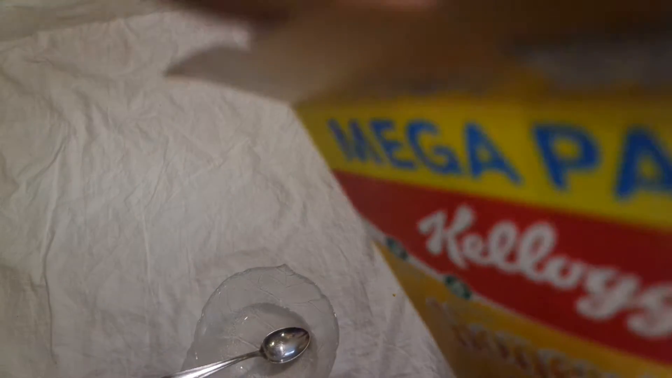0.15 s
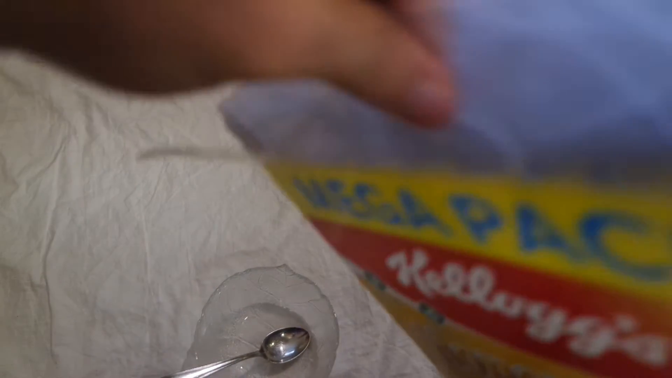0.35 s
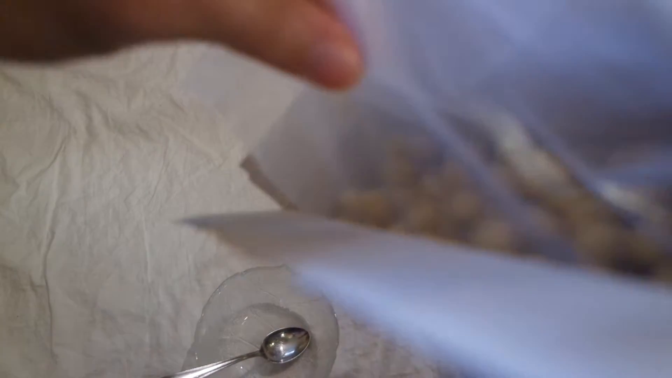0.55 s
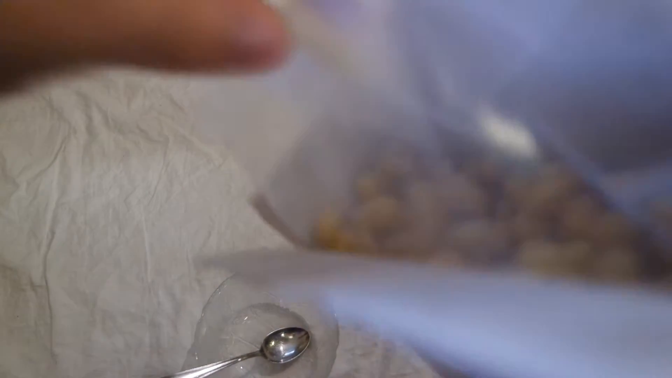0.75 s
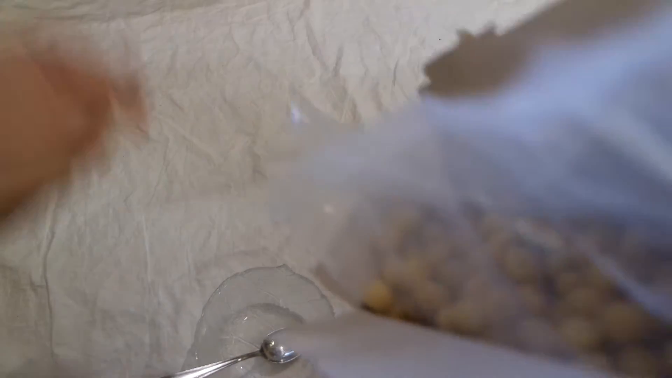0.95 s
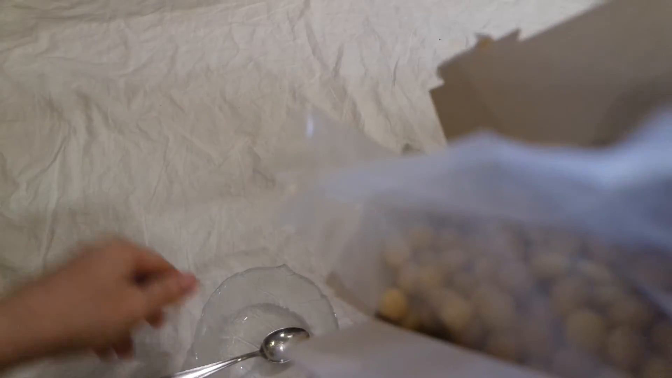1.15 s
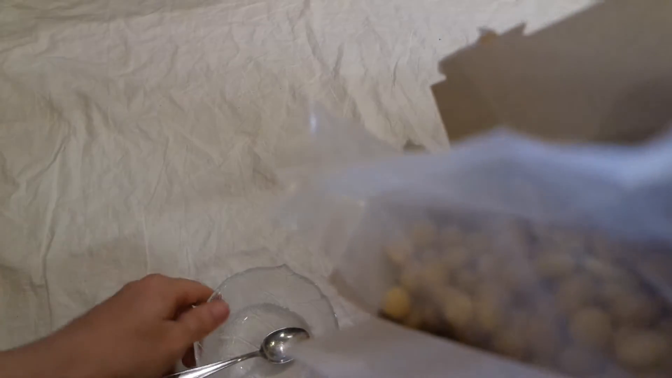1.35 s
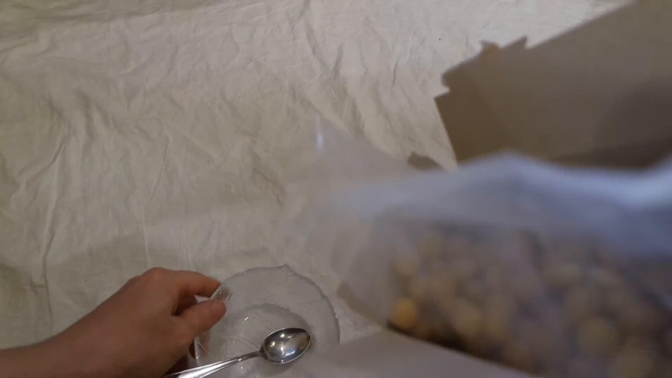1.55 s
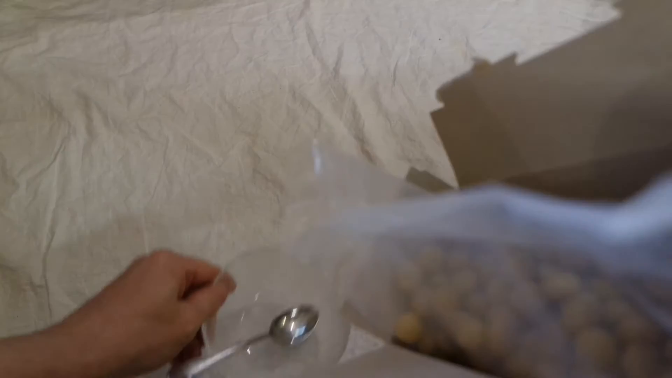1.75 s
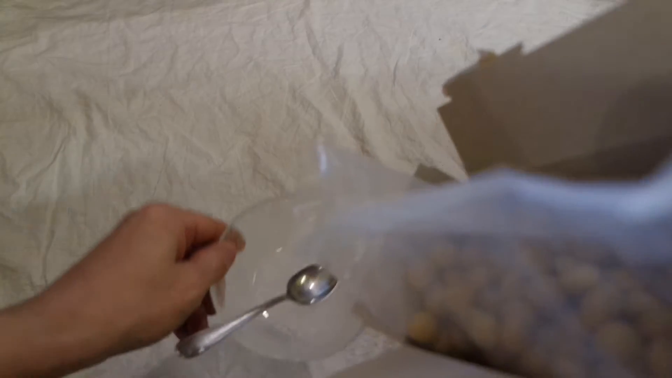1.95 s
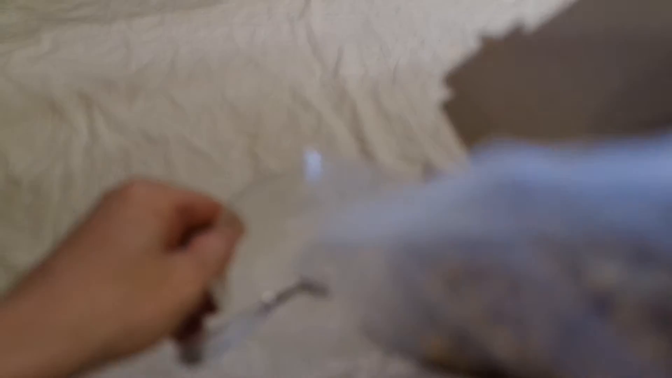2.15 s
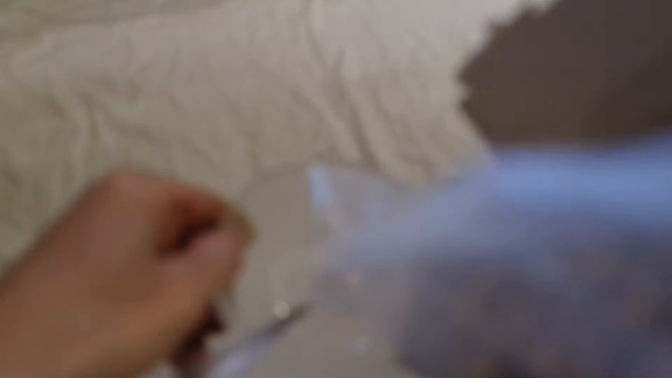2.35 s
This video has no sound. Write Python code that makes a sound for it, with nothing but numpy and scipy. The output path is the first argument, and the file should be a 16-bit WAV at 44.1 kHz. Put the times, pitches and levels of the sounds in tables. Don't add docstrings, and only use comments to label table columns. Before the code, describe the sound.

Close to the microphone indoors, plastic film snaps and rustles hard, followed by cereal rattling and dull cardboard knocks; after about a second only faint ticks, soft room hush and a small final rustle remain.

```python
import sys
import numpy as np
from scipy import signal
from scipy.fft import rfft, irfft
from scipy.io import wavfile
from scipy.ndimage import uniform_filter1d

SR = 44100
rng = np.random.default_rng(int(sys.argv[2]) if len(sys.argv) > 2 else 0)


def inscribe(sig):
    pcm = np.round(np.clip(np.atleast_2d(sig).T, -1, 1) * 32767)
    wavfile.write(sys.argv[1], SR, pcm.astype(np.int16))


def linear_from_db(decibels):
    return 10 ** (np.asarray(decibels, float) / 20)


N = 110250

# f/Hz, density/dB
SNAP_TONE = [(290, -22.5), (900, -6.5), (3900, -1.5), (5890, -3), (9270, -4.5), (10800, -5.5), (13200, 1.5),
             (14800, -9.5)]


def evened(x):
    return x / np.sqrt(np.mean(x ** 2) + 1e-20)


def read(points, hz):
    f, value = np.transpose(points)
    return np.interp(np.log(hz + 1), np.log(f + 1), value)


def add(mix, s, sound):
    part = mix[round(s * SR):][:len(sound)]
    part += sound[:len(part)]


def colour(x, points):
    hz = np.fft.rfftfreq(4096, 1 / SR)
    cepstrum = irfft(np.log(linear_from_db(np.maximum(read(points, hz), -90))))
    cepstrum = np.concatenate([cepstrum[:1], 2 * cepstrum[1:2048], np.zeros(2048)])
    response = irfft(np.exp(rfft(cepstrum)))[:2048]
    return signal.oaconvolve(x, response)[:len(x)]


def resonate(x, hz, width):
    r = np.exp(-np.pi * width / SR)
    return 2 * signal.lfilter([1 - r], [1, -r * np.exp(2j * np.pi * hz / SR)], x).real


def grains(rate, spread_db, low_hz, high_hz, cycles, count):
    sizes = linear_from_db(spread_db * np.minimum(rng.exponential(1, N), 4.5))
    clicks = sizes * (rng.random(N) < rate / SR)
    kind, out = rng.integers(0, count, N), np.zeros(N)
    for k, hz in enumerate(np.geomspace(low_hz, high_hz, count)):
        ringing = resonate(clicks * (kind == k), hz, hz / cycles)
        out += np.sqrt(hz) * ringing / hz * cycles
    return evened(out)


def strikes(rows, make):
    out = np.zeros((2, N))
    noise = rng.standard_normal((len(rows), 2, 6000))
    for (s, *settings), draws in zip(rows, noise):
        for port in range(2):
            add(out[port], s, make(*settings, draws[port]))
    return out


def movement(column):
    # start/s, hold/s, fade/(dB/s), liner rustle/dB, cereal shift/dB
    moves = [(-.05, 0.036, 73, -63, -69), (0.202, 0.11, 236.5, -37.5, -44), (0.352, 0.21, 150, -39, -44.5),
             (0.565, .1, 90, -39, -42), (0.687, .07, 105, -42, -55.5), (0.795, 0.15, 141, -38.5, -50.5),
             (0.84, 0.13, 101, -32.5, -38.5), (0.935, 0.13, 125, -33.5, -42.5),
             (1.063, 0.13, 128, -39.5, -46.5), (1.3, .11, 251, -63, -65.5), (1.725, 0.03, 245.5, -66, -68),
             (1.907, 0.018, 119.5, -60, -58.5), (1.98, 0.57, 100, -74, -71.5),
             (2.387, 0.037, 293.5, -65, -64.5), (2.429, 0.088, 148, -47, -47.5)]
    rise_s = 0.014
    t, power = np.arange(N) / SR, 0
    for start, hold, fade_db, *peak_db in moves:
        rise = np.clip((t - start) / rise_s, 0, 1)
        fade = fade_db * np.maximum(t - start - hold, 0)
        power = power + (rise * linear_from_db(peak_db[column] - fade)) ** 2
    return np.sqrt(power)


def pair(x, other):
    # f/Hz, left-right likeness (0 to 1)
    likeness = [(25, .3), (100, .9), (500, .97), (2000, .88), (5000, .68), (14000, .45)]
    lag_s, left_db = 2.4e-5, -2
    hz = np.fft.rfftfreq(N, 1 / SR)
    same = np.clip(read(likeness, hz), 0, 1)
    left = same * rfft(x) + np.sqrt(1 - same ** 2) * rfft(other)
    left = left * np.exp(-2j * np.pi * hz * lag_s)
    shade = linear_from_db(left_db * np.clip(hz / 4000 + 0.9, 0, 1.2))
    return np.array([irfft(left * shade, N), x])


def air():
    # f/Hz, density/dB
    hush_tone = [(12, -28.5), (20, 4.5), (198, -11.5), (455, -11), (599, -16.5), (1130, -18.5),
                 (3330, -26.5), (14800, -30.5)]
    hush_db, whine_db, whine_hz, whine_width_hz = -67.5, -89, 8050, 200
    a, b, c = rng.standard_normal((3, N))
    hush = pair(evened(colour(a, hush_tone)), evened(colour(b, hush_tone)))
    whine = evened(resonate(c, whine_hz, whine_width_hz))
    return linear_from_db(hush_db) * hush + linear_from_db(whine_db) * whine


def settling():
    return linear_from_db(-88) * grains(35, 2, 1200, 3500, 2.8, count=8)


def rustle():
    # f/Hz, density/dB
    liner_tone = [(710, -23), (1200, -10.5), (1580, -9.5), (6450, -6), (8750, -8), (13600, -2.5),
                  (14800, -7.5)]
    clump_s, clump_db = 0.003, 1.9
    span = max(round(clump_s * SR), 1)
    drift = uniform_filter1d(uniform_filter1d(rng.standard_normal(N), span), span)
    clumps = linear_from_db(clump_db * evened(drift))
    ports = []
    for _ in range(2):
        creases = clumps * grains(4000, -0.5, 760, 15000, 3.1, count=24)
        hiss = 0.15 * rng.standard_normal(N)
        ports.append(evened(colour(creases + hiss, liner_tone)))
    return movement(column=0) * np.array(ports)


def shifting():
    # f/Hz, width/Hz, level/dB
    box = [(425, 40, 1.5), (810, 38, 0), (1080, 90, -3.5), (1230, 51, -17.5), (2130, 120, -6.5)]
    # f/Hz, density/dB
    card_tone = [(18, -49), (30, -21), (110, -16), (260, -9.5), (413, -9.5), (655, -6), (800, -5),
                 (1080, -8.5), (1800, -16), (2340, -44), (3960, -120)]
    balls = grains(820, 0.5, 65, 2200, 2.3, count=16)
    sliding = evened(colour(rng.standard_normal(N), [(30, -5.5), (2500, 3), (4000, -35.5)]))
    drive = balls + 0.5 * sliding
    hollow = sum(linear_from_db(db) * resonate(drive, hz, width + 60) for hz, width, db in box)
    return movement(column=1) * evened(colour(drive + 0.11 * hollow, card_tone))


def knock(db, hz, ring_s, noise):
    t = np.arange(len(noise)) / SR
    phase = 2 * np.pi * hz * t
    modes = np.sin(phase) + 0.29 * np.sin(0.74 * phase)
    modes += 0.2 * np.sin(2 * phase) * linear_from_db(-60 * t / 0.03)
    body = modes * linear_from_db(-60 * t / max(ring_s, 0.01)) * np.minimum(t * hz / 0.47, 1)
    tick = 0.12 * resonate(noise, 2400, 1500) * linear_from_db(-60 * t / 0.015)
    return linear_from_db(db + 0.5) * (body + tick * hz / 400)


def knocks():
    # t/s, peak/dB, f/Hz, ring/s
    walls = [(0.176, -50.5, 187, 0.059), (0.424, -34, 708, 0.036), (.469, -31, 758, 0.034),
             (.525, -41, 890, 0.071), (.552, -42, 842, 0.19), (.553, -38, 425, .1), (.585, -39, 804, 0.11),
             (0.606, -31, 426, 0.075), (.648, -41, 433, 0.086), (.84, -38.5, 751, 0.044),
             (0.866, -34, 739, 0.14), (.879, -31.5, 998, 0.084), (.912, -28.5, 770, 0.037),
             (.948, -28.5, 434, 0.054), (0.996, -27, 282, 0.062), (1.05, -36, 780, 0.096),
             (1.1, -27, 413, 0.045), (1.1247, -21.5, 419, 0.024), (1.228, -37.5, 810, .03),
             (1.717, -58, 800, .04), (1.91, -49.5, 394, 0.025), (2.445, -56, 300, 0.055),
             (2.475, -39.5, 262, 0.082)]
    # t/s, peak/dB, f/Hz, ring/s
    thumps = [(0.236, -48, 97.2, 0.43), (0.28, -38, 149, 0.14), (0.412, -43.5, 112.5, 0.34),
              (.83, -42.5, 120, 0.12), (0.875, -36, 126, 0.14), (0.965, -43.5, 85, 0.11),
              (1.245, -46, 130, 0.08), (1.285, -52, 100, 0.092), (1.346, -54, 169, 0.079),
              (1.926, -47.5, 112, 0.12), (1.96, -51, 242.4, 0.088), (2.261, -59.5, 260, .08),
              (2.446, -47.5, 116, 0.14)]
    return strikes(walls + thumps, knock)


def snap(db, hz, ring_s, tilt_db, noise):
    noise = noise[:SR // 20]
    t = np.arange(len(noise)) / SR
    burst = noise * np.minimum(t / 0.0012, 1) ** 2
    crack = burst * linear_from_db(-60 * t / max(ring_s, 0.002))
    after = burst * linear_from_db(-26 - 60 * t / 0.013)
    tilt_db = np.clip(tilt_db, -8, 8)
    film = [(f, v + tilt_db * np.log2(max(f, 1500) / 5000)) for f, v in SNAP_TONE]
    patch = evened(resonate(resonate(crack, hz, 0.57 * hz), hz, 0.57 * hz))
    tone = evened(colour(crack + after, film)) + 0.62 * np.sqrt(hz / 6000) * patch
    return linear_from_db(db + 2.5) * tone / abs(tone).max()


def snaps():
    # t/s, peak/dB, f/Hz, ring/s, tilt/(dB/octave)
    creases = [(0.2089, -22.5, 1930, 0.047, 1), (0.2573, -24, 5030, 0.014, -4.5),
               (0.268, -6.5, 13500, 0.012, -2.1), (0.2768, -18.5, 5470, 0.008, 0.1),
               (0.2795, -9, 3810, 0.014, 2), (0.3699, -9.5, 12700, 0.011, 0), (0.3739, -15, 3760, 0.011, 8),
               (0.4, -18.5, 2800, 0.014, 6.5), (0.4181, -14.5, 13900, 0.008, 1.5),
               (0.4285, -14, 2500, 0.0057, 6), (0.4654, -18.5, 5080, 0.036, 3),
               (0.4729, -20, 2500, 0.012, -0.4), (0.5064, -24.5, 2790, 0.0062, -1.2),
               (0.5226, -37, 3430, 0.011, -10.9), (0.5337, -14.5, 11900, 0.0094, 6),
               (0.552, -18.5, 4260, 0.012, 0.5), (0.5538, -12.5, 2390, 0.024, 1),
               (0.5885, -36, 2610, 0.02, -4), (0.607, -12.5, 5210, 0.0063, 1),
               (0.62, -8, 12600, 0.004, 1.9), (0.716, -29, 2260, 0.016, -11),
               (0.8396, -20, 2500, 0.016, -5.5), (1.069, -17, 3250, 0.011, 7)]
    # t/s, peak/dB, f/Hz, ring/s, tilt/(dB/octave)
    ticks = [(0.9106, -19.5, 3360, 0.011, 0), (0.9482, -19, 4100, 0.011, 9), (1.0281, -30, 6650, 0.0069, 2),
             (1.1251, -17, 1850, 0.0049, -9), (1.2766, -36.5, 4660, 0.003, -2.5),
             (1.3076, -40, 4160, 0.0072, -10), (1.374, -38.5, 3710, 0.0092, 3.5),
             (1.4132, -49, 5960, 0.011, 8), (1.4624, -60.5, 1620, 0.01, 0),
             (1.716, -48.5, 2257, 0.011, -10.5), (1.7447, -52.5, 2440, 0.00985, -2.5),
             (1.9087, -34, 5300, 0.012, 4), (1.9241, -28.5, 5170, 0.0027, 4), (1.941, -51, 6000, 0.048, -3),
             (2.431, -32, 3770, 0.0099, -1.3)]
    # t/s, peak/dB, f/Hz, ring/s, tilt/(dB/octave)
    hardest = [(0.2924, -5.5, 8990, 0.009, 0)]
    return strikes(creases + ticks + hardest, snap)


def cracks():
    # t/s, peak/dB
    spike_table = [(.2934, .5), (.5345, -16), (.5557, -11), (.6082, -15), (.6208, -3.5), (.8408, -17),
                   (1.9107, -34), (1.9237, -29), (2.433, -24), (1.3085, -34)]
    spikes = np.zeros(N)
    for s, db in spike_table:
        add(spikes, s, linear_from_db(db) * np.ones(1))
    film = colour(np.eye(1, 300)[0], SNAP_TONE)
    return signal.oaconvolve(spikes, film / abs(film).max())[:N]


def tap(db, hz, noise):
    ring_s, width_hz = 0.014, 0.4 * hz
    t = np.arange(len(noise)) / SR
    burst = noise * linear_from_db(-60 * t / ring_s)
    tone = resonate(resonate(burst, hz, width_hz), hz, width_hz)
    return linear_from_db(db) * tone / abs(tone).max()


def taps():
    # t/s, peak/dB, f/Hz
    drops = [(.465, -31, 1840), (.6205, -23.5, 1310), (.8399, -23.5, 1810), (.8753, -29, 1640),
             (1.3075, -38, 4200), (1.345, -58, 6554), (1.382, -50.5, 4330), (1.428, -62, 1100),
             (1.463, -58, 5940), (1.508, -60, 1970), (1.5828, -62, 2220), (1.597, -59, 1100),
             (1.6632, -68.5, 2340), (1.736, -57, 4200), (1.8228, -59, 2320), (1.8667, -56, 4500),
             (1.985, -54.5, 2200), (2.037, -60.5, 4500), (2.085, -65, 2214), (2.331, -58, 1159),
             (2.465, -36, 2600)]
    return strikes(drops, tap)


def room(x):
    # f/Hz, t60/s
    decay = [(100, 0.58), (1000, 0.26), (4000, 0.099), (15000, 0.085)]
    echoes = np.zeros((2, SR // 2))
    at = np.arange(100, SR // 2 - 20, 20) + rng.integers(0, 20, (2, (SR // 2 - 101) // 20))
    np.put_along_axis(echoes, at, rng.choice([-1., 1.], at.shape), 1)
    hz, t, z = signal.stft(echoes, SR, nperseg=256)
    t60 = np.maximum(read(decay, hz), 0.02)[:, None]
    tail = signal.istft(z * linear_from_db(-60 * t / t60), SR, nperseg=256)[1]
    return signal.fftconvolve(x[None], tail / np.linalg.norm(tail[0]), axes=1)[:, :N]


def scene():
    film = rustle() + snaps() + cracks() + taps()
    box = knocks() + shifting()
    near = film + box + settling()
    echo = pair(*room(near[0]))
    return pair(near[0], near[1]) + linear_from_db(-13) * echo + air()


def roll_off(x):
    return signal.sosfilt(signal.butter(12, 16790, fs=SR, output="sos"), x)


def record(dry):
    shelf_hz, shelf_db, edge_hz = 15150, -37, 16700
    hz = np.fft.rfftfreq(N, 1 / SR)
    corners = [shelf_hz - 150, shelf_hz + 150, edge_hz, edge_hz + 200]
    top_db = np.interp(hz, corners, [0, shelf_db, shelf_db - 8, -90])
    mix = irfft(rfft(np.clip(dry, -0.9, 0.9)) * linear_from_db(top_db), N)
    return roll_off(mix)


dry = scene()
out = record(dry)
inscribe(out)
```